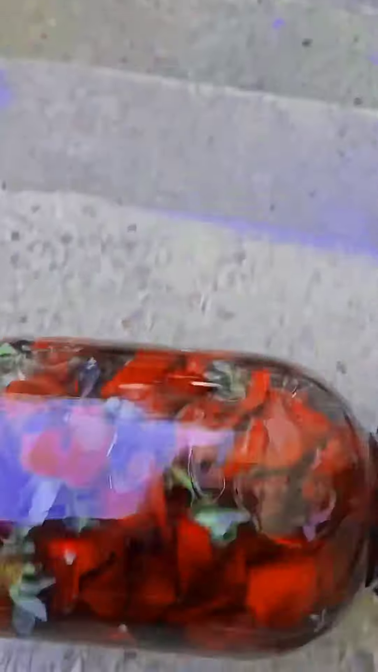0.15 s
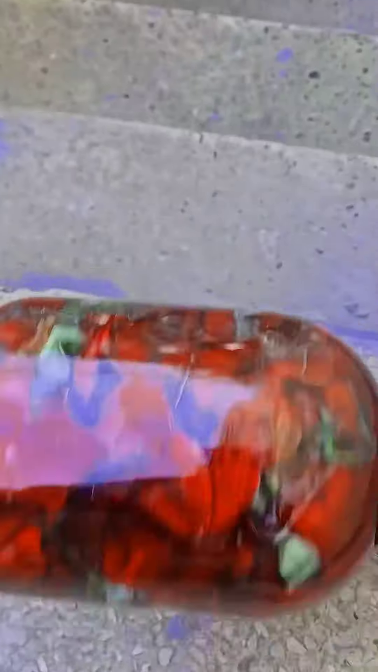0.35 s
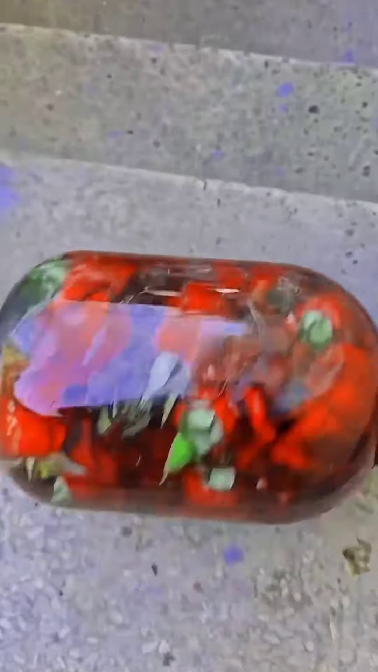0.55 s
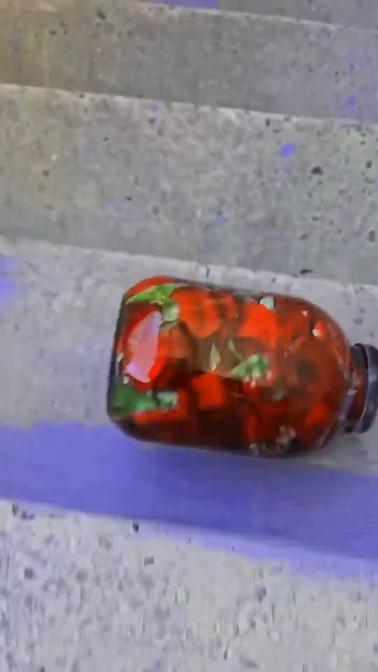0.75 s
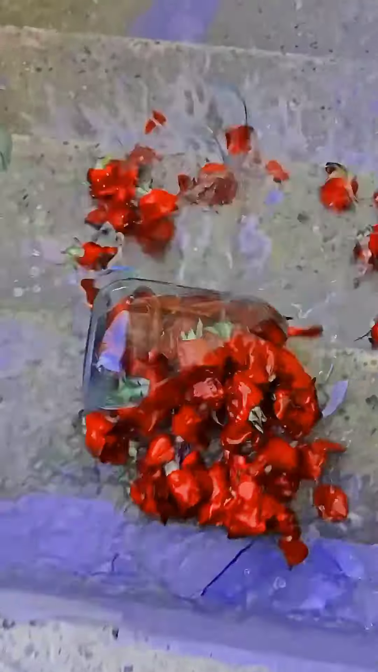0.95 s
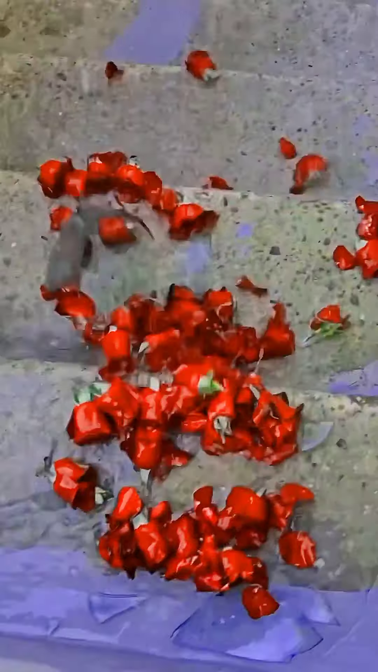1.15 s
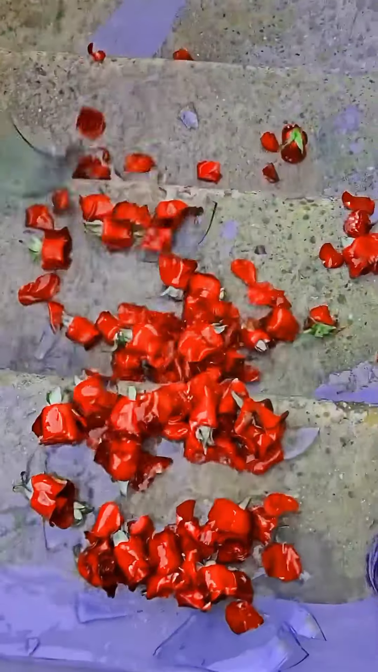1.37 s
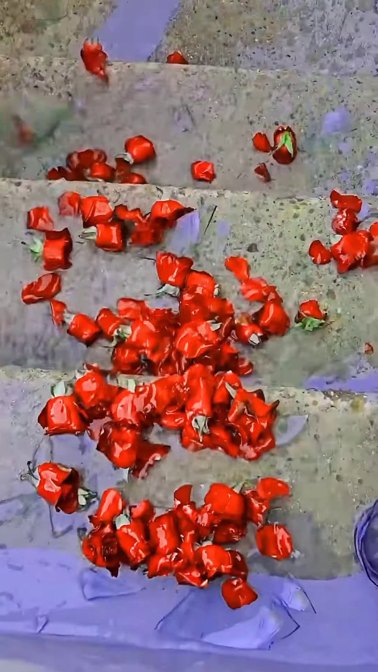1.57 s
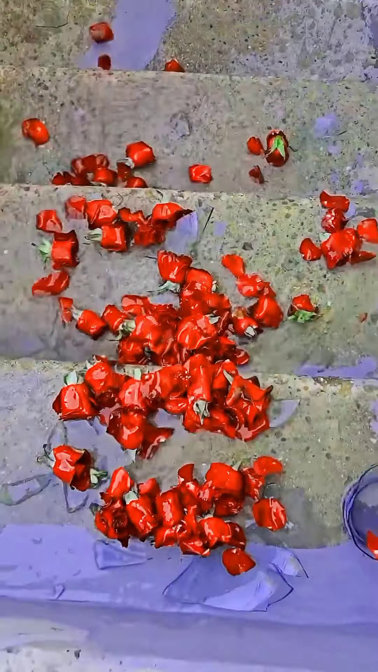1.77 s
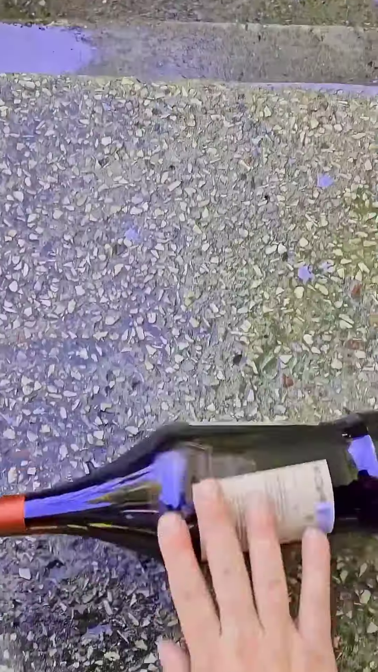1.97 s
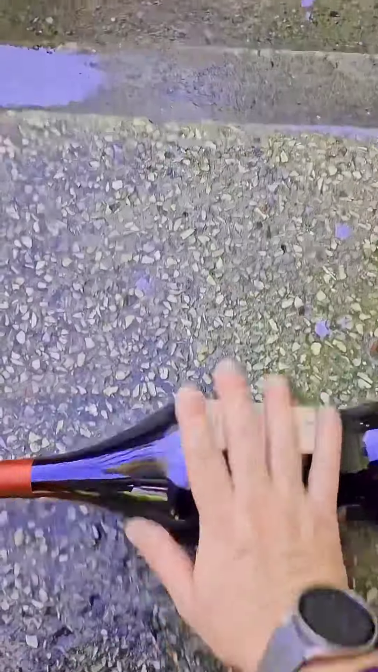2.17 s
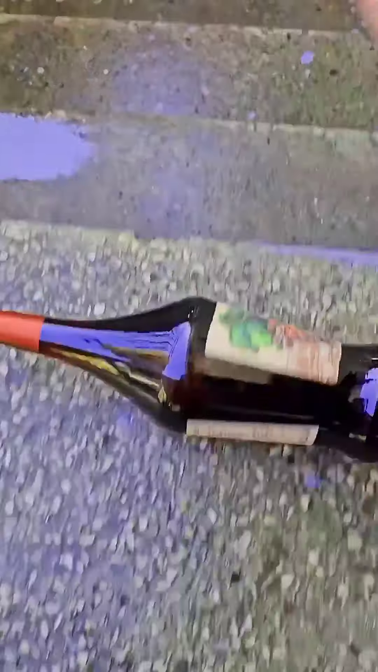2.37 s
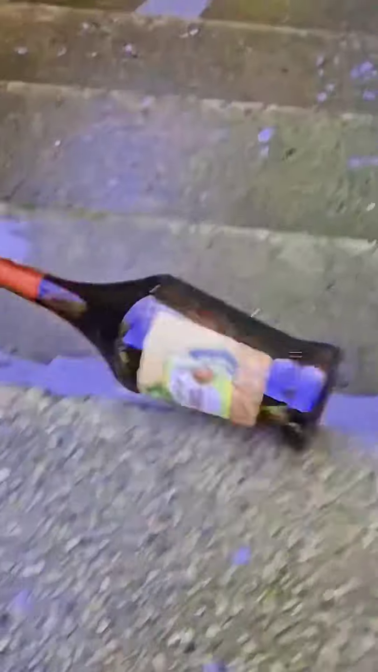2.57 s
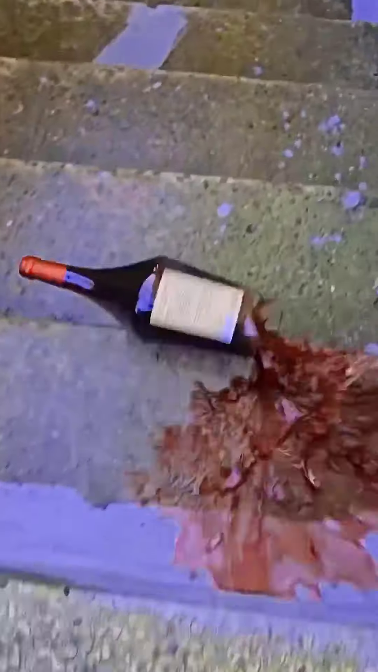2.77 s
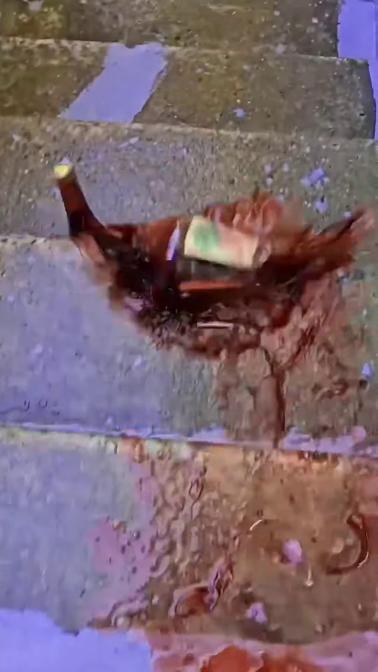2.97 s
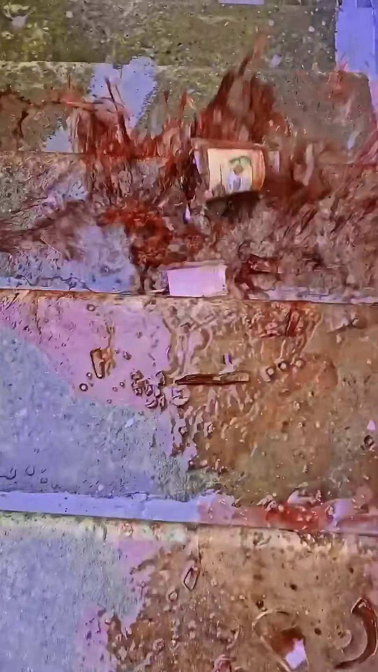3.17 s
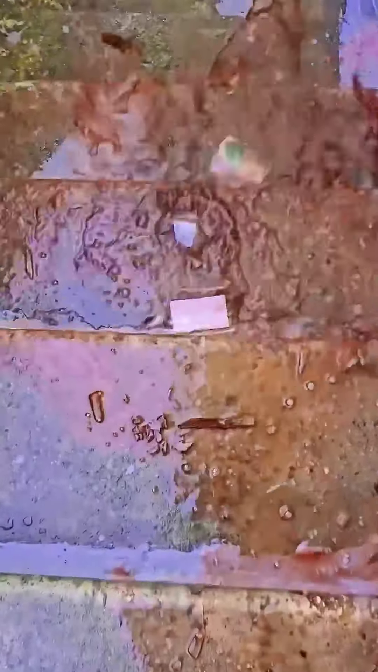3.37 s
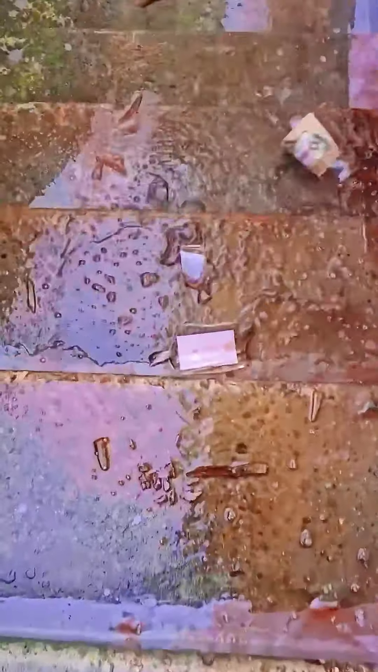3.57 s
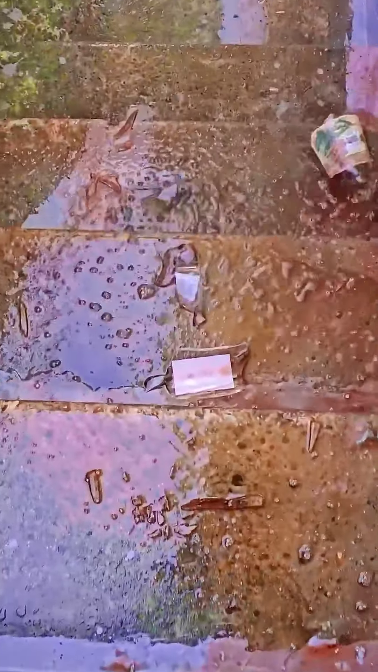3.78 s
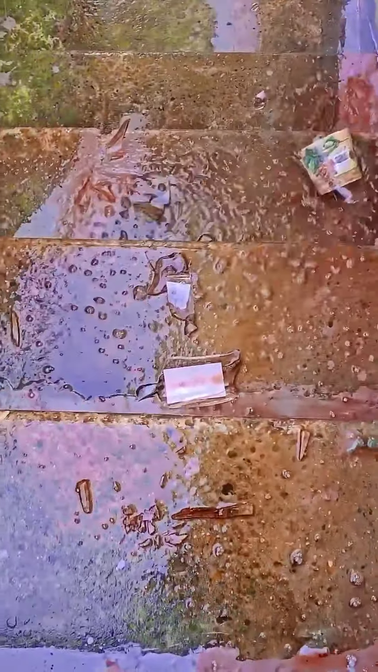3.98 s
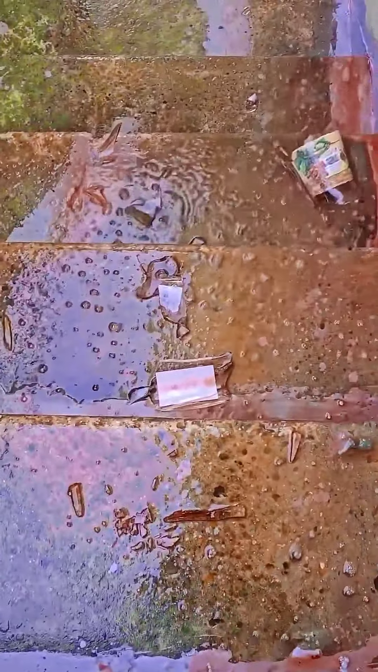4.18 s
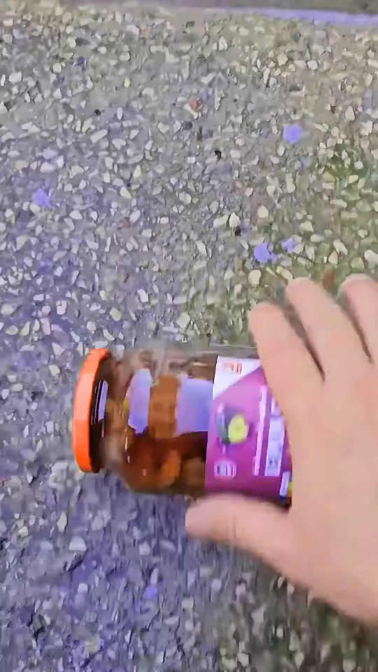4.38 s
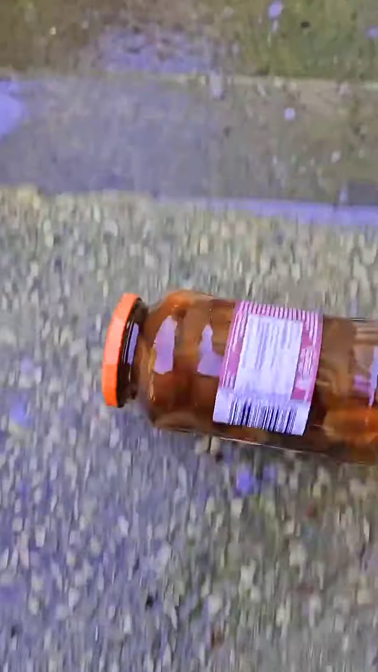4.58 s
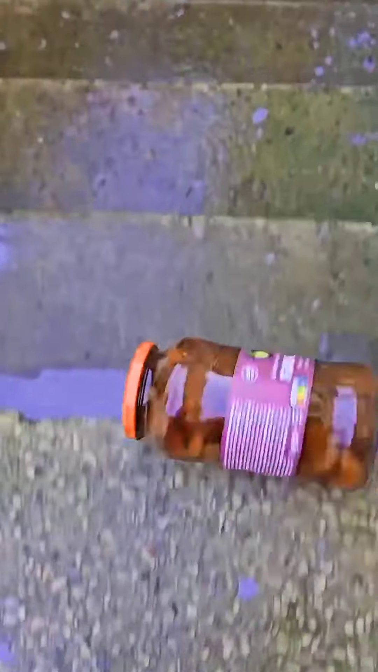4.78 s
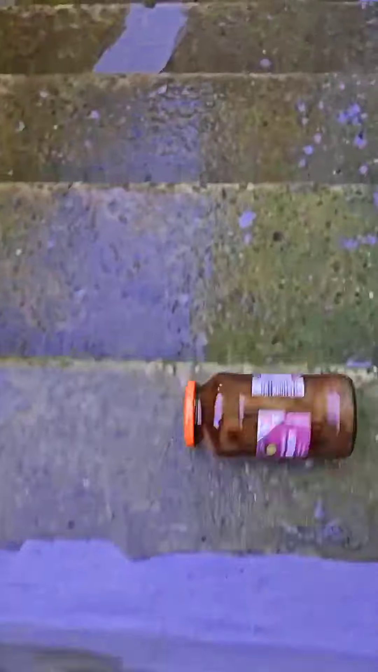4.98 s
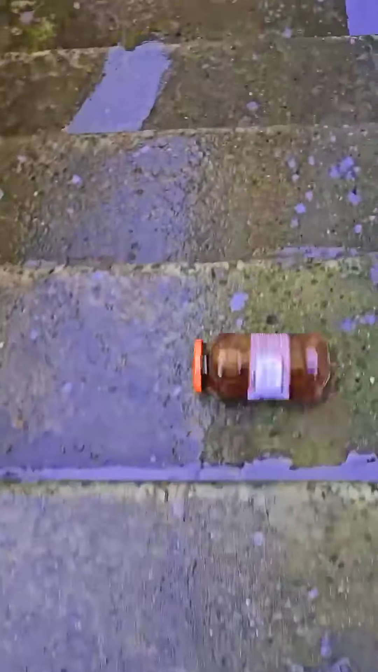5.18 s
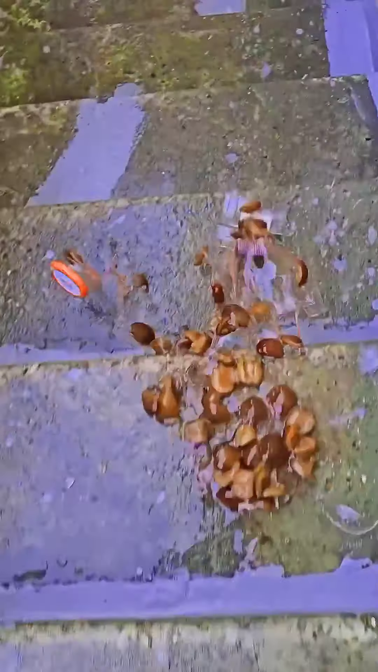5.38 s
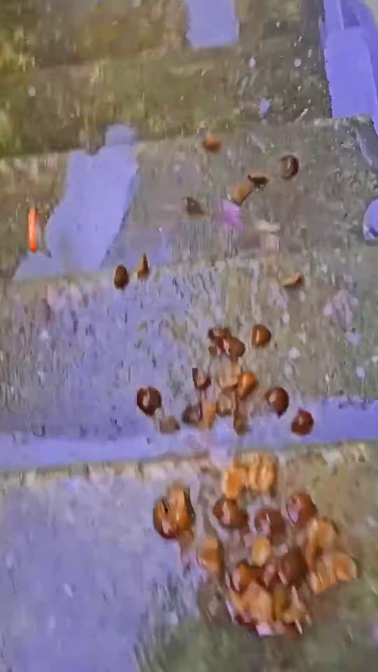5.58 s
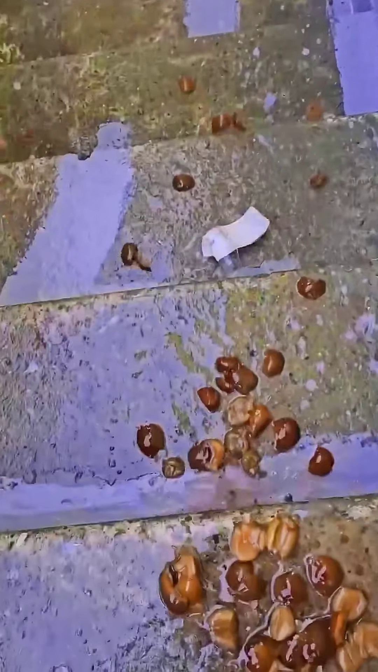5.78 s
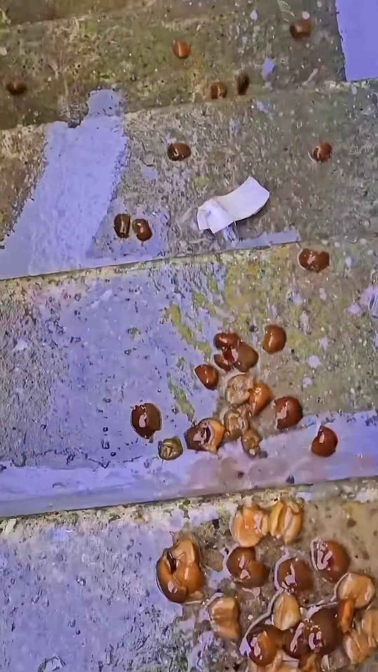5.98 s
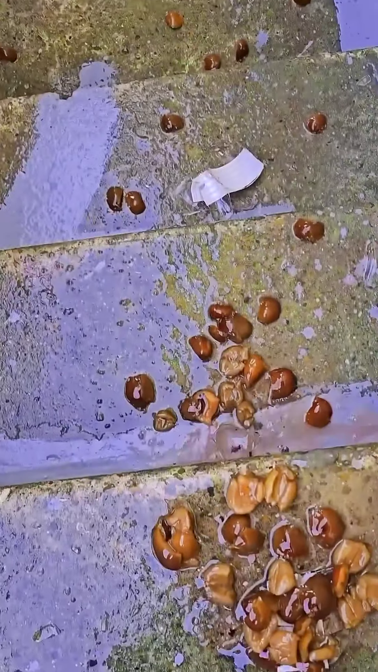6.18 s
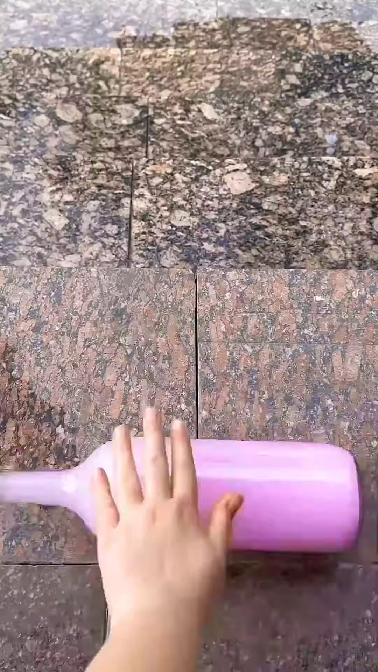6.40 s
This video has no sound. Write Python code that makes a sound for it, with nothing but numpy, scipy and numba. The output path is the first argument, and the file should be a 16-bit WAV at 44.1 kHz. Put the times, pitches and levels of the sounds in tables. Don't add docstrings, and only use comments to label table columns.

```python
import sys
import numpy as np
from scipy import signal
from scipy.fft import rfft, irfft
from scipy.io import wavfile
from scipy.ndimage import uniform_filter1d
from numba import njit

SR = 44100
rng = np.random.default_rng(int(sys.argv[2]) if len(sys.argv) > 2 else 0)


def gain_from_db(level_db):
    decades = np.asarray(level_db, float) / 20
    return 10 ** decades


def output_pcm(signal):
    pcm = np.clip(np.atleast_2d(signal).T, -1, 1) * 32767
    wavfile.write(sys.argv[1], SR, np.round(pcm).astype(np.int16))


N = 284136


def unit(x):
    return x / np.sqrt(np.mean(x ** 2))


def curve(rows, column):
    rows = np.array(rows, float)
    return np.interp(np.arange(N) / SR, rows[:, 0], rows[:, column])


def shaped(x, points):
    hz, db = np.transpose(points)
    f = np.maximum(np.fft.rfftfreq(N, 1 / SR), 1)
    gain = gain_from_db(np.interp(np.log(f), np.log(hz), db))
    return irfft(rfft(x) * gain, N)


def hiss(lo_hz, hi_hz, alike, lag=0):
    common, left, right = rng.standard_normal((3, N))
    shared = np.array([common, np.roll(common, int(lag))])
    c = np.clip(alike, 0, 1)
    pair = np.sqrt(c) * shared + np.sqrt(1 - c) * np.array([left, right])
    band = signal.butter(2, [lo_hz, min(hi_hz, .45 * SR)], "band", fs=SR, output="sos")
    return unit(signal.sosfilt(band, pair))


def flicker(size, spread_db):
    drift = unit(uniform_filter1d(rng.standard_normal(N), size=size))
    return unit(gain_from_db(spread_db * drift))


def patchy(lo_hz, hi_hz, alike, lag, count):
    edges = np.geomspace(lo_hz, hi_hz, count)
    return sum(hiss(lo, hi, alike, lag) * np.sqrt(hi - lo) * flicker(size=1300, spread_db=5.5)
               for lo, hi in zip(edges, edges[1:]))


@njit
def add(out, start, stop, hz, t60, rise, size):
    for k in range(len(start)):
        turn = np.exp(2j * np.pi * hz[k] / SR - np.log(1000) / (t60[k] * SR))
        closing = np.exp(-1 / (rise[k] * SR))
        z, gap, first = size[k] + 0j, 1., int(start[k])
        for i in range(max(first, 0), min(first + int(t60[k] * SR), int(stop[k]))):
            z *= turn
            gap *= closing
            out[i] += z.real * (1 - gap) ** 2


SCENE_STARTS = [
    0,
    2.021,
    4.279,
]


def rings(s, hz, t60, rise, size, pan_db, lag):
    values = np.broadcast_arrays(s, hz, t60, rise, size, pan_db, lag)
    s, hz, t60, rise, size, pan_db, lag = (np.ascontiguousarray(v, float) for v in values)
    ends = np.append(np.array(SCENE_STARTS[1:]) * SR, N)
    stop = ends[np.searchsorted(SCENE_STARTS, s, "right") - 1]
    t60, rise = np.abs(t60), np.abs(rise)
    out = np.zeros((2, N))
    add(out[0], s * SR, stop, hz, t60, rise, size * gain_from_db(pan_db / 2))
    add(out[1], s * SR + lag, stop, hz, t60, rise, size * gain_from_db(-pan_db / 2))
    return out


# (time [s], level [dB])
ROLLING = [
    [(0.0, -31.5), (0.3, -34), (0.84, -41)],
    [(2.03, -39), (2.25, -27.5), (2.464, -20.5), (2.55, -28), (2.66, -50)],
    [(4.28, -46), (4.5, -26), (4.65, -17), (4.85, -24.5), (4.9, -43), (5.0, -65)],
]
ROLLING_HZ = [
    527,
    915,
    1100,
]


def rolling():
    per_s = 150
    out = 0
    for rows, hz in zip(ROLLING, ROLLING_HZ):
        s, db = np.transpose(rows)
        count = int(per_s * (s[-1] - s[0]))
        timing, tuning, force, place = rng.random((count, 4)).T
        at = s[0] + (np.arange(count) + 1.8 * timing) / per_s
        pitch = hz * 2 ** (1.3 * (tuning - .4))
        size = gain_from_db(np.interp(at, s, db) + 9 + np.minimum(-3.5 * np.log(force), 7))
        out = out + rings(at, pitch, 4 / pitch, .0002, size, 1.3 + 5 * (place - .5), 3)
    return out


# (time [s], level [dB])
BREEZE = [(0.0, -28.5), (0.2, -34), (1.9, -43), (2.6, -30), (2.87, -37), (2.98, -24), (3.07, -40.5),
          (4.5, -46), (4.57, -30), (5.25, -44), (5.3, -27), (5.44, -46.5), (5.61, -38.5), (6.44, -54.5)]
# (frequency [Hz], density [dB per Hz])
BREEZE_COLOUR = [(20, -11), (48, -1), (97, -3), (386, -21), (499, -18), (600, -14.5), (780, -21),
                 (1320, -120)]
# (frequency [Hz], density [dB per Hz])
AIR = [(150, -50), (250, 1.5), (444, -33), (528, -8), (816, -11.5), (7840, -30), (11700, -65), (16000, -56)]


def outdoors():
    breeze = unit(shaped(hiss(15, 700, .9), BREEZE_COLOUR))
    breeze = breeze * flicker(size=2000, spread_db=1.5) * gain_from_db(curve(BREEZE, 1))
    air = unit(shaped(hiss(280, 17000, 0.08), AIR))
    return breeze + air * gain_from_db(-57)


# (time [s], level [dB])
DEBRIS = [
    [(0.0, -37.5), (0.84, -49), (0.85, -25), (1.054, -27), (2.02, -28)],
    [(2.021, -50.5), (2.23, -43), (2.4, -29.5), (2.58, -53), (2.69, -38), (3.38, -34), (4.08, -46.5),
     (4.278, -57)],
    [(4.279, -49.5), (4.85, -43.5), (5.3, -73), (5.47, -40.5), (5.77, -28), (6.16, -45.5), (6.44, -81)],
]
DEBRIS_MIDDLE_DB = [
    -11.5,
    -6,
    -4,
]
# (burst time [s], drying time [s], ringing gain [dB])
DRYING = [
    (.85, .08, 6.5),
    (2.7, .8, 3.5),
    (5.2, .25, 4),
]


def loose():
    t = np.arange(N) / SR
    vessel = np.searchsorted(SCENE_STARTS, t, "right") - 1
    high = gain_from_db(curve(np.vstack(DEBRIS), 1))
    scrape = sum(gain_from_db(curve(rows, 1) - 16) * (t >= rows[0][0]) * (t < rows[-1][0]) for rows in ROLLING)
    burst, drying, gain_db = np.array(DRYING)[vessel].T
    ringing = gain_from_db(-4.5 + gain_db * np.clip((t - burst) / drying, 0, 1))
    return high, high * gain_from_db(np.array(DEBRIS_MIDDLE_DB)[vessel]) + scrape, ringing


# (time [s], level [dB], rise [s], t60 [s])
GRIT = [(0.126, -18.5, 0.0016, 0.025), (0.231, -5, 0.0032, 0.027), (0.262, -1.5, 0.017, 0.1),
        (0.359, -22, 0.0018, 0.036), (0.387, -25.5, 0.0035, 0.072), (0.532, -19, 0.0093, 0.11),
        (0.6976, -19.5, 0.0059, 0.084), (0.841, -18.5, 0.021, 0.93), (2.2015, -23, 0.0035, 0.024),
        (2.402, -7.5, 0.0047, 0.019), (2.544, -22.5, 0.0052, 0.085), (4.437, -24, 0.0066, 0.018),
        (4.519, -20, 0.0051, 0.037), (4.832, -26, 0.0022, 0.02), (5.006, -25.5, 0.0051, 0.16),
        (5.252, -23.5, 0.011, 0.5)]
# (time [s], treble level [dB], weight [dB], t60 [s])
JAR_CRASHES = [(0.8682, -4, -20, 0.16), (0.958, -15, -28, 0.066), (0.995, -6, -23.5, 0.1),
               (1.019, -10.5, -21.5, 0.15), (1.0703, -17, -29.5, 0.1), (1.0858, -21.5, -22, 0.19),
               (1.1243, -4, -31.5, 0.16), (1.181, -6, -21, 0.2), (1.241, 0, -27, 0.15),
               (1.2973, -18.5, -21, 0.066), (1.341, -9.5, -33.5, 0.24), (1.3954, -7, -31, 0.099),
               (1.4646, -12.5, -31, 0.11), (1.487, -13.5, -27.5, 0.43), (1.555, -17.5, -23.5, 0.18),
               (1.6114, -12.5, -15, 0.33), (1.777, -23, -22.5, 0.92), (1.828, -19, -14.5, 0.18),
               (1.901, -13, -39, 0.068), (1.931, -20, -37, 0.089), (2.011, -7, -38, 0.042)]
BOTTLE_CRASHES = [(2.67, -18, -12, 0.21), (2.713, -10, -18.5, 0.11), (2.784, -16, -9.5, 0.055),
                  (2.9228, -13, -11.5, 0.16), (3.021, -29, -7, 0.051), (3.121, -9, -15, 0.22),
                  (3.223, -15, -15.5, 0.13), (3.239, -8.5, -20.5, 0.15), (3.431, -12.5, -19.5, 0.26),
                  (3.479, -16, -25.5, 0.22), (3.632, -19.5, -18, 0.13), (3.771, -22.5, -17.5, 0.12),
                  (3.905, -27.5, -17, 0.39), (3.994, -18, -30, 0.063), (4.15, -47, -6, 0.4)]
SMALL_CRASHES = [(5.0206, -29, -4.5, 0.34), (5.274, -9.5, -19.5, 0.36), (5.454, -4.5, -52, 0.11),
                 (5.469, -3.5, -31.5, 0.25), (5.537, -14.5, -20.5, 0.13), (5.663, -16, -24, 0.11),
                 (5.687, -16, -37, 0.042), (5.7187, -22.5, -15, 0.19), (5.768, -21, -24, 0.19),
                 (5.8054, -10.5, -30, 0.06), (5.87, -13, -34, 0.058), (5.8863, -11, -42, 0.048),
                 (5.935, -17, -27.5, 0.086), (5.947, -8, -25.5, 0.1), (6.0877, -21, -42, 0.016),
                 (6.2854, -17.5, -16.5, 0.12), (6.377, -34, -9.5, 0.18)]
BASS_DB = [
    5.7,
    9,
    3.9,
    4.8,
]


def crashes():
    bass_per_weight, grit_weight_db = 1.286, -14.5
    heavy_rise_s, light_rise_s, light_below_db = 0.00029, 0.0036, -42.5
    grit_bass_db = BASS_DB[0] + bass_per_weight * grit_weight_db
    rows = [(s, db, grit_weight_db, grit_bass_db, rise, t60) for s, db, rise, t60 in GRIT]
    for table, bass_db in zip((JAR_CRASHES, BOTTLE_CRASHES, SMALL_CRASHES), BASS_DB[1:]):
        for s, db, weight_db, t60 in table:
            lightness = min(weight_db / light_below_db, 1)
            rise = heavy_rise_s + (light_rise_s - heavy_rise_s) * lightness
            rows.append((s, db, weight_db, bass_db + bass_per_weight * weight_db, rise, t60))
    return np.transpose(rows)


# (frequency [Hz], density [dB per Hz])
SHARD_COLOUR = [(2400, 4.5), (2750, -16), (3220, 2), (4340, 3), (7990, 1.5), (10600, -6.5), (11700, -2),
                (15700, -7)]


def glass():
    s, db, mid_db, low_db, rise, t60 = crashes()
    high = rings(s - .001, 0, t60, rise, gain_from_db(db - 7), 0, 0)[0]
    mid = rings(s - .001, 0, t60 * .9, rise, gain_from_db(db + mid_db + 10), 0, 0)[0]
    low = rings(s - .001, 0, t60 * .8, rise, gain_from_db(db + low_db + 3), 0, 0)[0]
    loose_high, loose_mid, ringing = loose()

    when, which, force, damping, place, delay, detune = rng.random((7000, 7)).T
    pool_pitch, pool_decay = rng.random((600, 2)).T
    at = when * N / SR
    alive = (60 * at + 110 * which).astype(int)
    hz = 1200 + 15000 * pool_pitch[alive] ** 1.3 + 60 * detune
    clink_t60 = .025 + .2 * pool_decay[alive] * damping
    i = (at * SR).astype(int)
    colour_hz, colour_db = np.transpose(SHARD_COLOUR)
    colour = gain_from_db(np.interp(np.log(hz), np.log(colour_hz), colour_db))
    drive = np.where(hz > 2900, (high + loose_high)[i] * colour, (mid + loose_mid)[i] * gain_from_db(-0.5))
    size = drive * ringing[i] * gain_from_db(-16.5 + np.minimum(-4 * np.log(force), 7.5))
    clinks = rings(at, hz, clink_t60, .002, size, 3.5 + 8 * (place - .5), 8 + 14 * (delay - .5))
    clinks = clinks * flicker(size=150, spread_db=2.5)

    first_crack = rings(s, 0, 0.042, rise * 0.41, gain_from_db(db - 8.5), 0, 0)[0]
    high = high + first_crack + loose_high * gain_from_db(-6)
    mid = mid + loose_mid * gain_from_db(-3)
    treble = unit(shaped(patchy(2500, 17000, .45, 10, count=20), SHARD_COLOUR)) * gain_from_db(-5.5)
    middle = unit(patchy(900, 3000, .5, 4, count=9)) * gain_from_db(-5)
    grind = (high * treble + mid * middle) / ringing * gain_from_db([[1.8], [-1.8]])
    thud = low * hiss(93, 875, 0.6, 9.1)
    return clinks + (grind + thud) * flicker(size=60, spread_db=2.0)


# (time [s], level [dB], pitch [Hz])
JAR_KNOCKS = [(0.02, -9.5, 527), (0.046, -13.5, 527), (0.075, -8, 527), (0.099, -15.5, 500),
              (0.108, -23, 450), (0.128, -13, 500), (0.162, -19.5, 420), (0.214, -19.5, 400),
              (0.326, -29.5, 350), (0.39, -27, 566), (0.426, -25.5, 455), (0.466, -10.5, 550),
              (0.482, -13.5, 504), (0.51, -15.5, 404), (0.536, -24, 400), (0.562, -23.5, 370),
              (0.596, -19, 328), (0.631, -19, 325), (0.656, -17.5, 456), (0.682, -27, 330),
              (0.703, -20.5, 302), (0.737, -26, 500)]
BOTTLE_KNOCKS = [(2.127, -44, 744), (2.225, -15, 910), (2.264, -4, 1350), (2.278, -23, 860),
                 (2.2869, -2, 1470), (2.296, -17, 850), (2.338, -11, 895), (2.3532, -7.5, 890),
                 (2.366, -24, 850), (2.378, -4.5, 870), (2.384, -13, 800), (2.409, -22, 740),
                 (2.426, -5.5, 910), (2.438, -19, 905), (2.451, -13, 1100), (2.47, -8.5, 1100),
                 (2.4756, -0.5, 980), (2.501, -13, 1000), (2.5124, 3.5, 1500), (2.525, -11, 840),
                 (2.583, -9.5, 1380)]
SMALL_KNOCKS = [(4.285, -22.5, 524), (4.346, -26.5, 520), (4.392, -23, 540), (4.481, -14.5, 590),
                (4.492, -16, 660), (4.531, -15, 595), (4.547, -12, 1100), (4.559, -12, 900),
                (4.578, -10.5, 1150), (4.587, -4, 1520), (4.607, 1.5, 1530), (4.621, -1.5, 1340),
                (4.633, -1, 1320), (4.641, -4, 1660), (4.654, -16, 1500), (4.669, 0.5, 1510),
                (4.708, -4.5, 1360), (4.739, -5.5, 1430), (4.759, -12, 1500), (4.786, -12, 1310),
                (4.8, -10.5, 1590), (4.81, -10, 1490), (4.834, -10.5, 1110), (4.864, -18, 1200),
                (5.022, 0, 1100), (5.037, 4.5, 1630)]
# (time [s], level [dB], pitch [Hz])
LANDINGS = [(0.233, -2.5, 2700), (0.275, -17, 2130), (0.865, -7, 1910), (1.187, -22, 570), (1.61, -21, 745),
            (2.673, 2.5, 1330), (2.7151, -1, 2440), (2.722, -9, 890), (2.783, -14, 1000), (2.82, -20, 3000),
            (2.838, -23, 3100), (2.856, -24, 3000), (2.898, -18, 3300), (2.912, -22, 3200),
            (2.9233, -8.5, 920), (3.123, -11, 790), (3.221, -13.5, 1350), (3.768, -20, 855),
            (5.276, -11.5, 312), (5.277, -2.5, 1440), (5.535, -22, 700), (5.578, -24, 450),
            (5.646, -19, 504), (6.29, -21, 655)]


def knocks():
    s, db, hz = np.transpose(JAR_KNOCKS + BOTTLE_KNOCKS + SMALL_KNOCKS + LANDINGS)
    half = 256
    out, t = np.zeros((2, N + 2 * half)), np.arange(-half, half) / SR
    for start, gain, f in zip(s, gain_from_db(db), hz):
        swing = -gain * np.cos(2 * np.pi * f * t) * np.exp(-(t * f / .5) ** 2)
        i = max(int((start + 0.00049) * SR) - half, 0)
        out[:, i:i + 2 * half] += [swing * gain_from_db(.6), np.roll(swing, 2) * gain_from_db(-.6)]
    ticks = rings(s, 0, 0.0087, 0.00054, gain_from_db(db - 24.5), 0, 0) * hiss(1500, 12000, 0.72, 1.8)
    wobble = 1 + 0.332 * rng.standard_normal(len(s))
    after_ring = rings(s + .0012, hz * wobble, 18 / hz, .0003, gain_from_db(db - 14), 1.2, 3)
    return out[:, :N] + ticks + after_ring


# (time
# [s], level [dB], pitch [Hz], t60 [s])
HOLLOWS = [(0.13, -15.5, 246, 0.08), (0.163, -17, 272, 0.1), (1.186, 6.5, 574, 0.018),
           (1.526, -28, 486, 0.26), (5.721, -3.5, 750, 0.032), (5.945, -19, 799, 0.11),
           (6.289, -18.5, 786, 0.16), (6.378, -33, 780, 0.19), (0.872, -8, 240, 0.068),
           (0.899, -4, 256, 0.023), (5.276, 0.5, 324, 0.038), (5.306, -20.5, 329, 0.13)]
# (time [s], level [dB], pitch [Hz], t60 [s])
JAR_TINGS = [(0.9573, -2, 3084, 0.022), (1.023, -8.5, 3260, 0.076), (1.1283, 0.5, 4490, 0.084),
             (1.295, -14, 4240, 0.14), (1.469, -13, 4290, 0.13), (1.779, -18, 2570, 0.095),
             (0.9696, -9.5, 7480, 0.058), (1.0724, -14.5, 8100, 0.2), (1.1272, -3, 6150, 0.025),
             (1.186, -12, 8060, 0.088), (1.2442, -4, 9400, 0.093), (1.345, -6, 8160, 0.13),
             (1.398, -12.5, 10120, 0.15), (1.487, -5, 11450, 0.064), (2.0099, -4.5, 9400, 0.034)]
BOTTLE_TINGS = [(2.262, -19, 1413, 0.44), (2.2856, -18, 1515, 0.29), (2.673, -21, 1500, 0.079),
                (2.672, -8, 2642, 0.15), (2.765, -24, 7660, 0.12), (2.8741, 1, 7600, 0.019),
                (3.1654, -9.5, 5810, 0.065), (3.255, -13.5, 7140, 0.14)]
SMALL_TINGS = [(5.571, -9.5, 5440, 0.19), (5.666, -23.5, 8000, 0.21), (5.8053, -14.5, 5403, 0.18),
               (5.871, -14, 9440, 0.05), (5.9502, 12.5, 10200, 0.014), (6.0867, -13.5, 10390, 0.038)]
# (time [s], level [dB], pitch [Hz], t60 [s])
JAR_CLINKS = [(0.893, -15, 1960, 0.092), (0.921, -22, 6280, 0.107), (0.995, -17, 7280, 0.11),
              (0.996, -14, 11200, 0.091), (1.017, -19, 14640, 0.077), (1.022, -10.5, 6200, 0.04),
              (1.023, -13, 5030, 0.065), (1.046, -30, 529, 0.24), (1.129, -17.5, 2350, 0.12),
              (1.211, -11.5, 6900, 0.066), (1.237, -29, 4280, 0.362), (1.255, -20, 6700, 0.062),
              (1.294, -19, 7300, 0.07), (1.296, -26, 6760, 0.1), (1.34, -20, 14900, 0.045),
              (1.357, -20.5, 5040, 0.041), (1.4, -20, 13200, 0.077), (1.419, -16, 6280, 0.11),
              (1.487, -19, 6190, 0.22), (1.492, -24, 11900, 0.14), (1.526, -21, 6140, 0.15),
              (1.529, -20, 9600, 0.032), (1.556, -10, 7670, 0.062), (1.571, -18, 15800, 0.051),
              (1.608, -23.5, 4890, 0.2), (1.613, -13, 6150, 0.051), (1.622, -26.5, 8160, 0.18),
              (1.635, -24, 4290, 0.085), (1.69, -18, 11540, 0.056), (1.749, -24, 5820, 0.11),
              (1.783, -24, 1150, 0.17), (1.785, -21, 7800, 0.23), (1.839, -17, 8070, 0.087),
              (1.843, -27, 4500, 0.64), (1.876, -29, 6800, 0.13), (1.88, -30, 8270, 0.22),
              (1.903, -14.5, 8870, 0.071), (1.93, -17, 8080, 0.07), (1.937, -17, 4424, 0.14)]
BOTTLE_CLINKS = [(2.201, -20, 2860, 0.13), (2.222, -32.5, 860, 0.29), (2.398, -16, 5470, 0.05),
                 (2.58, -18.5, 1574, 0.096), (2.875, -18, 2150, 0.022), (2.881, -10, 1670, 0.021),
                 (3.151, -17, 4270, 0.037), (3.196, -31.5, 9560, 0.51), (3.257, -18, 9000, 0.099),
                 (3.434, -20, 5620, 0.14), (3.542, -26, 7850, 0.13), (3.542, -22.5, 4474, 0.36),
                 (3.666, -34, 15720, 0.07), (3.771, -21.5, 9650, 0.07), (3.858, -35, 15300, 0.06),
                 (3.918, -8, 3910, 0.075), (3.638, -15, 3890, 0.083), (3.03, -32, 6150, 0.081),
                 (3.983, -13, 3980, 0.092)]
SMALL_CLINKS = [(5.329, -15, 9150, 0.05), (5.463, -6, 7640, 0.07), (5.463, -16, 4080, 0.075),
                (5.468, -20, 14340, 0.025), (5.467, -9, 5400, 0.088), (5.486, -10.5, 2340, 0.043),
                (5.534, 1, 9040, 0.04), (5.535, -1.5, 740, 0.016), (5.666, -25, 4090, 0.04),
                (5.667, -24, 2070, 0.09), (5.679, -26, 8200, 0.055), (5.688, -8, 9770, 0.051),
                (5.81, -10, 11660, 0.048), (5.872, -26, 1890, 0.074), (5.958, -16, 1980, 0.038),
                (5.983, -30, 4090, 0.085), (6.048, -31, 8280, 0.078), (6.051, -16.5, 4060, 0.09),
                (6.378, -37, 3070, 0.023)]


def shards():
    s, db, hz, t60 = np.transpose(JAR_TINGS + BOTTLE_TINGS + SMALL_TINGS + HOLLOWS
                                  + JAR_CLINKS + BOTTLE_CLINKS + SMALL_CLINKS)
    place, delay, up, up_late, down, down_late = rng.random((len(s), 6)).T
    pan_db, lag = 3.5 + 6 * (place - .5), 2 + 7 * delay
    spread_hz = 70 + .012 * hz
    out = rings(s, hz, t60, .0015, gain_from_db(db - 3), pan_db, lag)
    for side, u, late in ((1, up, up_late), (-1, down, down_late)):
        again, near_hz = s + .15 * t60 * late, hz + side * spread_hz * (.3 + u)
        out = out + rings(again, near_hz, t60 * .6, .002, gain_from_db(db - 11), pan_db, lag)
    return out * flicker(size=220, spread_db=1.8)


# (time [s], level [dB])
CRACKS = [(0.235, -5), (0.276, -7), (0.289, -5), (0.8699, -3), (0.877, -1), (1.129, -5.5), (1.2457, -7),
          (1.488, -17), (2.6728, -8.5), (2.7147, -6.5), (2.922, -7), (3.439, -13), (5.4704, -9),
          (5.5343, -4), (5.543, -20), (5.951, -12)]
CRACK_HZ = [
    2300,
    5200,
    8600,
]


def cracks():
    s, db = np.transpose(CRACKS)
    tuning = rng.random((len(s), 3)).T
    return sum(rings(s, hz * (.8 + .4 * u), 0.0031, .00005, gain_from_db(db - 3), 3, 4)
               for hz, u in zip(CRACK_HZ, tuning))


# (frequency [Hz], level relative to the knock [dB], t60 [s])
BOTTLE_MODES = [
    (2000, -22, .03),
    (2900, -20, .04),
    (4700, -33, .035),
    (5600, -34, .03),
]


def bottle():
    s, db, _ = np.transpose(BOTTLE_KNOCKS)
    uneven_db = 3.5 * rng.standard_normal((len(s), len(BOTTLE_MODES))).T
    return sum(rings(s, hz * (1 + .013 * u), t60, .0006, gain_from_db(.6 * db + mode_db + u), 1., 2)
               for (hz, mode_db, t60), u in zip(BOTTLE_MODES, uneven_db))


# (time [s], first mode level [dB], second mode level [dB], rise [s], t60 [s])
BASE = [
    (3.426, -29, -51, 0.0009, 0.065),
    (3.6255, -25.5, -39.5, 0.00084, 0.077),
    (3.776, -46, -75.5, 0.0019, 0.11),
    (3.906, -9, -50, 0.0091, 0.06),
    (3.9861, -39, -32.5, 0.0061, 0.12),
    (4.149, -38.5, -68.5, 0.003, 0.17),
]
BASE_HZ = [
    3907,
    5662,
    9680,
    11190,
    14100,
]


def base():
    s, first_db, second_db, rise, t60 = np.transpose(BASE)
    upper_db = -29.5 + 0.92 * first_db
    levels = (first_db + 5.5, second_db + 18, upper_db + 14.5, upper_db + 15, upper_db + 15.5)
    lengths = (1.8, 1.08, 1.5, 1.6, 0.68)
    out = 0
    for hz, db, length in zip(BASE_HZ, levels, lengths):
        out = out + rings(s, hz, t60 * length, rise, gain_from_db(db), 10.0, 12.1)
        out = out + rings(s, hz * 1.008, t60 * length, rise, gain_from_db(db), 1.1, 8.5)
    return out * flicker(size=400, spread_db=1.5)


# (delay [s], level [dB])
STEP_ECHOES = [
    (.0021, -14),
    (.0047, -17),
    (.0093, -20),
    (.016, -24),
    (.027, -29),
]


def scene():
    near = rolling() + glass() + knocks() + shards() + cracks() + bottle() + base()
    slaps = 0
    for k, (s, db) in enumerate(STEP_ECHOES):
        crossed = near[::(-1) ** k]
        slaps = slaps + gain_from_db(db) * np.roll(crossed, int(s * SR), axis=1)
    t = np.arange(N) / SR
    since_change = t - np.array(SCENE_STARTS)[np.searchsorted(SCENE_STARTS, t, "right") - 1]
    return near + slaps * (since_change > STEP_ECHOES[-1][0]) + outdoors()


def roll_off(x):
    return signal.sosfilt(signal.butter(12, 16810, fs=SR, output="sos"), x)


def record(dry):
    ceiling, top_hz = .98, 15900
    rounded = ceiling * np.tanh(dry / ceiling)
    low_pass = signal.ellip(8, .2, 60, top_hz, fs=SR, output="sos")
    return roll_off(signal.sosfilt(low_pass, rounded))


dry = scene()
out = record(dry)
output_pcm(out)
```